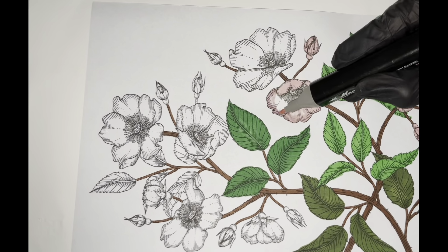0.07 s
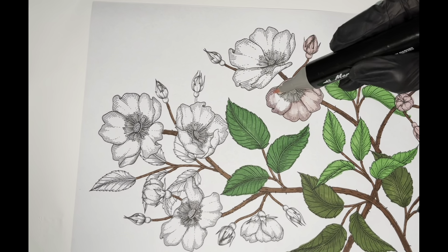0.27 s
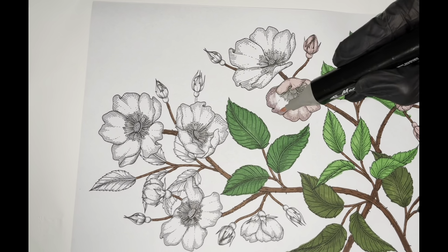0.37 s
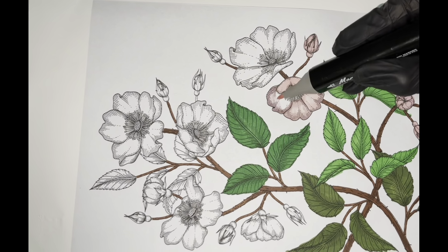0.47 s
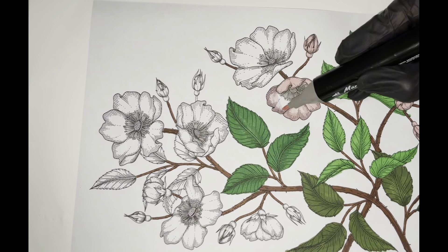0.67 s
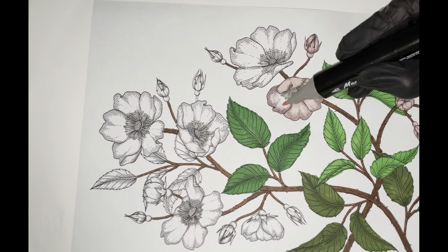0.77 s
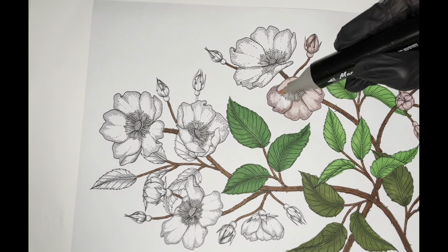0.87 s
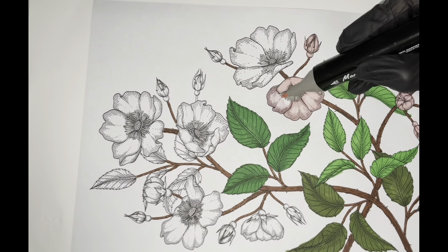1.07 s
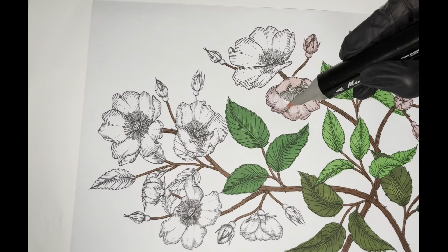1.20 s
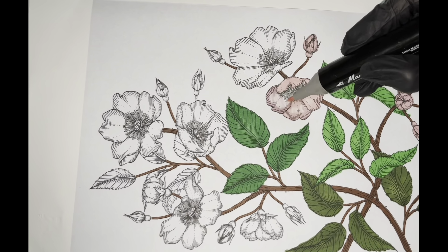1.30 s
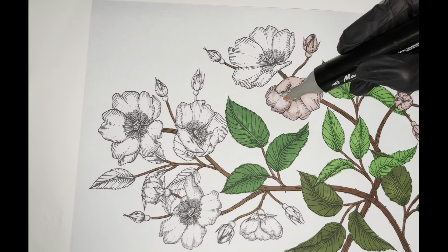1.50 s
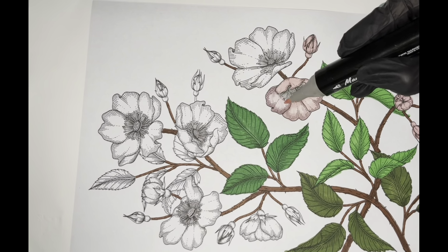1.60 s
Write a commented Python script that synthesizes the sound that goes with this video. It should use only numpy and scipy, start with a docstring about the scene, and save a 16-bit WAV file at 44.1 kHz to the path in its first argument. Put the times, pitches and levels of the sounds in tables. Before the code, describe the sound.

A felt marker scratches on paper, close up, in short back-and-forth strokes with a slight squeaky rub. The strokes come about six a second, are strongest around 0.8 to 1.2 seconds, then quicken and fade out by 1.7 seconds. Soft arm thuds and hand bumps on the desk come near 0.2 and 0.6 seconds, and most clearly around 1.35. A faint low rumble fills the small, quiet room.

```python
"""At a desk in a small, quiet room, a felt marker colours a little patch of paper.
Its short back-and-forth strokes quicken and then fade. The tip catches on paper fibres and rubs,
which makes the pen and the sheet ring. The arm shifts with soft thuds and the hand bumps the desk
a few times. It is all heard close up, in stereo, over a low rumble."""
import sys
import numpy as np
from scipy import signal
from scipy.fft import rfft, irfft
from scipy.io import wavfile
from scipy.ndimage import uniform_filter1d

SR = 44100
rng = np.random.default_rng(int(sys.argv[2]) if len(sys.argv) > 2 else 0)


def int16_out(signal):
    """Quantize to a 16-bit WAV file."""
    q = np.round(np.clip(np.atleast_2d(signal).T, -1, 1) * 32767)
    wavfile.write(sys.argv[1], SR, q.astype(np.int16))


N = 72765

# Marker strokes; levels are before mixing (touch time [s], fastest time [s], lift time [s],
# scratch level [dB], drop by the lift [dB], rub level [dB], pen ring level [dB],
# squeak level [dB], squeak pitch [Hz])
STROKES = [(-.03, 0.003, 0.033, -46.5, 10, -52, -57, -63, 3220),
           (0.034, 0.052, 0.12, -57.5, 6, -58, -76, -64, 3207),
           (0.194, .204, 0.19, -56, 15, -63, -45, -51, 3487),
           (0.193, 0.222, 0.29, -45.5, 12.5, -55, -81, -64.5, 3289),
           (0.34, 0.371, 0.45, -41, 25, -53, -77, -63.5, 3338),
           (0.414, 0.437, 0.46, -78, 11, -70, -74, -67.5, 3175),
           (0.501, 0.521, 0.58, -45, 8, -61.5, -59, -77, 3499),
           (0.634, 0.653, 0.7, -42, 5.5, -57, -54.5, -61.5, 3300),
           (0.821, 0.84, 0.9, -40.5, 18.5, -54, -66, -58, 3446),
           (0.948, 0.963, 1.028, -38.5, 15, -54, -45, -55, 3397),
           (1.069, 1.086, 1.111, -44, 4, -57.5, -50.5, -63.5, 3300),
           (1.185, 1.207, 1.234, -40.5, 15, -58, -41, -56.5, 3251),
           (1.277, 1.292, 1.311, -46.5, 16.5, -56, -53, -62, 3210),
           (1.331, 1.345, 1.353, -47.5, 7, -51.5, -44, -55, 3250),
           (1.371, 1.385, 1.396, -48.5, 8, -59.5, -54, -63, 3150),
           (1.409, 1.421, 1.445, -52.5, 14, -61, -58, -76, 3204),
           (1.488, 1.49, 1.515, -75, 9, -56.5, -68, -68.5, 3106),
           (1.535, 1.575, 1.565, -82, 4, -50.5, -66, -63, 3140),
           (1.643, 1.648, 1.68, -60.5, 3, -62.5, -84, -70, 3231)]
# Tone of the scratching fibres (frequency [Hz], level [dB])
SCRATCH_TONE = [(300, -38), (700, -14), (1400, -8), (2050, -9.5), (2600, -5.5), (3400, -4), (4400, -2.5),
                (6200, -6), (7400, -2.5), (8400, -5), (9700, -2), (11600, -2.5), (12100, -54)]
# Pitches that the paper on the desk boosts or weakens (frequency [Hz], width [Hz], gain [dB])
PAPER_RINGS = [(1510, 100, 6), (2560, 220, 3.5), (2970, 300, -9), (5040, 147, 6), (6780, 287, 9.5),
               (7160, 300, 4.5), (7950, 98, 1.5), (8740, 230, 1.5), (9700, 86, -6), (10500, 235, 6.5),
               (10980, 220, 6)]
# Pitches at which the pen's tip and barrel ring (frequency [Hz], width [Hz], level [dB])
PEN_RINGS = [(1464, 120, -4.5), (1580, 98, 0.5), (3480, 430, -19.5), (5950, 115, 0.5), (6190, 67, -0.5),
             (6620, 230, 1), (7010, 350, -6), (7660, 180, -5)]
# Tone of the rubbing tip (frequency [Hz], level [dB])
RUB_TONE = [(400, -45), (770, -10.5), (960, -1.5), (1200, -1), (1450, 3), (1650, -1.5), (1850, -18.5),
            (2150, -19), (2650, -11), (3100, -12), (3650, -37), (4600, -32), (5400, -15.5), (5950, -10.5),
            (6800, -15), (8000, -34), (12500, -27)]
# Tone of the room's background noise (frequency [Hz], level [dB])
BACKGROUND_TONE = [(15, 4.5), (35, 2.5), (60, 6), (80, -9), (150, -7), (260, -17.5), (450, -22.5),
                   (900, -26), (1600, -33.5), (4000, -41.5), (11000, -40), (13000, -49)]
# Soft thuds from the arm (time [s], peak level [dB], pitch [Hz])
ARM_THUDS = [(0.179, -42, 45.4), (0.323, -52, 49.7), (.626, -38, 45.4), (1.346, -37.5, 58),
             (1.485, -42, 50.5)]
# Bumps of the hand dragging on the desk (time [s], rise [s], fall [s], level [dB], judder rate [Hz],
# roughness [0 even, about 1 all noise], brightness [dB per octave])
HAND_BUMPS = [(0.351, 0.027, 0.22, -60.5, 213.3, 0.95, -4), (0.59, 0.024, 0.018, -43, 133.5, 0.6, -17),
              (0.677, 0.034, 0.015, -52.5, 130.8, 0.47, -5.5),
              (0.955, 0.019, 0.015, -52.5, 124.5, 0.56, -1), (1.166, 0.052, 0.15, -60, 218, 1, -1.5),
              (1.199, 0.017, 0.026, -47, 268, 0.5, -3.5), (1.327, 0.018, 0.02, -31, 123.2, 0.31, 2.5),
              (1.346, 0.02, 0.017, -35.5, 217.9, 0.85, 0), (1.386, 0.0091, 0.024, -37, 195.1, 0.58, -1.5),
              (1.501, 0.069, 0.049, -58, 120, 1.03, -7)]
# Pitches at which the desk rings (frequency [Hz], width [Hz], level [dB])
DESK_RINGS = [(100, 19, -5.5), (128, 60, 5.5), (189.4, 20, 2.5), (235, 18, 5.5), (350.2, 29, -8),
              (441, 28, -1.5), (530, 30, -10.5), (678, 160, -4), (840, 21, -2)]


def undb(db):
    """Turn decibels into a number to multiply by."""
    return 10 ** (np.asarray(db) / 20)


def unit(x):
    """Scale a signal so its average power is 1."""
    return x / np.sqrt(np.mean(x ** 2))


def colour(x, tone):
    """Shape a sound's lows and highs to follow a tone table."""
    hz, db = np.array(tone).T
    freqs = np.maximum(np.fft.rfftfreq(N, 1 / SR), 1)
    return irfft(rfft(x) * undb(np.interp(np.log(freqs), np.log(hz), db)), N)


def band(x, hz, width_hz):
    """Keep the sound near one pitch; a narrower band rings longer."""
    return signal.lfilter(*signal.iirpeak(hz, hz / width_hz, fs=SR), x)


def wander(per_s):
    """A smooth random drift, about 1 in size."""
    hold = max(int(SR / per_s), 1)
    return unit(uniform_filter1d(rng.standard_normal(N)[np.arange(N) // hold], hold))


def fibre_snaps(t, shared=0.36, right_lag_s=0, per_s=11000):
    """Tiny snaps, louder where the tip catches; the shared part reaches both ears."""
    hits = rng.random((3, N)) < per_s / SR
    sizes = undb(2 * rng.exponential(size=(3, N)))
    left, right, both = hits * sizes * np.sign(rng.standard_normal((3, N)))
    centre = np.array([both, np.interp(t - right_lag_s, t, both)])
    snaps = np.sqrt(1 - shared) * np.array([left, right]) + np.sqrt(shared) * centre
    return snaps * undb(0.52 * wander(per_s=380))


def stroke_loudness(t, levels_db, follow_speed=1):
    """Each stroke swells as the pen speeds up, sinks as it slows and dies away as it lifts."""
    power = 0
    for (touch, fastest, lift, _, drop_db, *_), level_db in zip(STROKES, levels_db):
        still_to_gain = np.clip((fastest - t) / (fastest - touch), 0, 1)
        slowing = np.clip((t - fastest) / (lift - fastest), 0, 1)
        speed_db = -14 * still_to_gain ** 2 - drop_db * slowing ** 1.27
        # steep fades, in dB per second, before the touch and after the lift
        contact_db = -1888 * np.maximum(touch - t, 0) - 684 * np.maximum(t - lift, 0)
        power += undb(level_db + follow_speed * speed_db + contact_db) ** 2
    return np.sqrt(power)


def paper_scratch(t):
    """Snapping fibres make a bright scratch that rings the sheet."""
    scratch = colour(fibre_snaps(t, shared=0.26, right_lag_s=0.00016), SCRATCH_TONE)
    for hz, width, db in PAPER_RINGS:
        scratch = scratch + (undb(db) - 1) * band(scratch, hz, width)
    return unit(scratch)


def pen_ring(t):
    """Snaps ring the tip and barrel; a second, wider band sharpens each pitch."""
    snaps = fibre_snaps(t)
    rings = (undb(db) * band(band(snaps, hz, width), hz, 2.4 * width) for hz, width, db in PEN_RINGS)
    return unit(sum(rings))


def tip_rub(t):
    """The felt slides over the fibres with a duller rubbing sound."""
    return unit(colour(fibre_snaps(t), RUB_TONE))


def tip_squeak(t, width_hz=540, wander_hz=69.7):
    """Snaps ring the felt; its pitch changes with each stroke and drifts as the tip tilts."""
    _, fastest, *_, pitches_hz = zip(*STROKES)
    centre_hz = np.mean(pitches_hz)
    ring = band(band(fibre_snaps(t), centre_hz, width_hz), centre_hz, width_hz)
    shift_hz = np.interp(t, fastest, pitches_hz) - centre_hz + wander_hz * wander(per_s=25)
    # slide the whole ring up or down by shift_hz
    shifted = signal.hilbert(ring) * np.exp(2j * np.pi * np.cumsum(shift_hz) / SR)
    return unit(shifted.real)


def marker(t):
    """Scratch and pen ring follow the pen's speed closely, rub and squeak less so."""
    _, _, _, scratch_db, _, rub_db, ring_db, squeak_db, _ = zip(*STROKES)
    scratch = paper_scratch(t) * stroke_loudness(t, scratch_db)
    ring = pen_ring(t) * stroke_loudness(t, ring_db)
    rub = tip_rub(t) * stroke_loudness(t, rub_db, follow_speed=0.44)
    squeak = tip_squeak(t) * stroke_loudness(t, squeak_db, follow_speed=0.44)
    return undb(1) * scratch + undb(1.5) * ring + rub + squeak


def room_echo(x, t, fade_s=0.043):
    """The room adds a short echo, different in each ear, that falls 60 dB in fade_s."""
    tail = unit(rng.standard_normal((2, N)) * np.exp(-np.log(1000) * t / fade_s)) / np.sqrt(N)
    return x + undb(-12.5) * signal.fftconvolve(x, tail, axes=1)[:, :N]


def background(t, rest_s=1.51):
    """A faint, wide hiss and a low, central rumble that sinks as the arm comes to rest."""
    centre, side = (unit(colour(rng.standard_normal(N), BACKGROUND_TONE)) for _ in range(2))
    hiss, side = signal.lfilter(*signal.butter(1, 360, "high", fs=SR), [centre, side])
    rumble = (centre - hiss) * undb(-5.5 * np.clip((t - rest_s) / 0.02, 0, 1))
    return undb(-56.5) * np.array([hiss + rumble + side, hiss + rumble - side])


def arm_thuds(t, fade_s=0.0093):
    """The shifting arm makes deep, soft thuds, each only a wave or two long."""
    return sum(undb(db) * np.exp(-((t - at) / fade_s) ** 2) * np.cos(2 * np.pi * hz * (t - at))
               for at, db, hz in ARM_THUDS)


def hand_bumps(t):
    """The hand sticks and slips as it drags, and this judder makes the desk ring."""
    bumps = 0
    lowest_hz = DESK_RINGS[0][0]
    for at, rise, fall, db, hz, rough, bright_db in HAND_BUMPS:
        push = np.exp(-np.maximum(at - t, 0) ** 2 / rise ** 2 - np.maximum(t - at, 0) / fall)
        phase = 2 * np.pi * np.cumsum(hz * (1 + 0.0805 * wander(per_s=90))) / SR
        judder = unit(np.sin(phase) - undb(-1.5) * signal.sawtooth(phase))
        grind, side_grind = unit(band(rng.standard_normal((2, N)), hz, 0.62 * hz))
        force = np.array([(1 - rough) * judder + rough * grind, side_grind])
        ring = sum(undb(ring_db + bright_db * np.log2(ring_hz / lowest_hz)) * band(force, ring_hz, width)
                   for ring_hz, width, ring_db in DESK_RINGS)
        centre, side = (unit(part) * np.sqrt(np.mean(push ** 2)) for part in push * ring)
        # the deepest notes sound alike in both ears
        side = 0.73 * signal.lfilter(*signal.butter(1, 223, "high", fs=SR), side)
        bumps += undb(db) * np.array([centre + side, centre - side])
    muffled = signal.sosfilt(signal.butter(6, 844, fs=SR, output="sos"), bumps)
    return muffled * undb([[-1.5], [1.5]])  # a little to the right


def scene():
    """The marker and its echo, the hand, the arm and the background together."""
    t = np.arange(N) / SR
    return room_echo(marker(t), t) + hand_bumps(t) + arm_thuds(t) + background(t)


def record(dry):
    """Cut away the highest treble, above 12000 Hz."""
    return signal.sosfilt(signal.ellip(8, .2, 70, 12000, fs=SR, output="sos"), dry)


dry = scene()
out = record(dry)
int16_out(out)
```